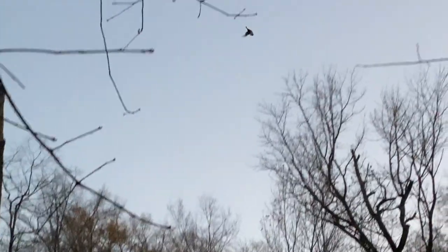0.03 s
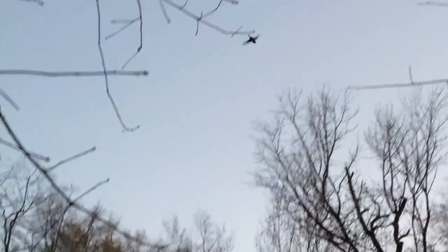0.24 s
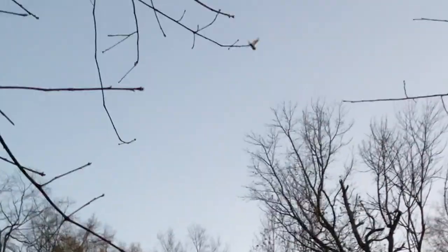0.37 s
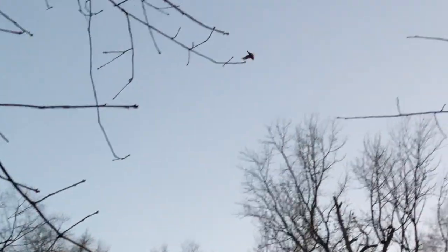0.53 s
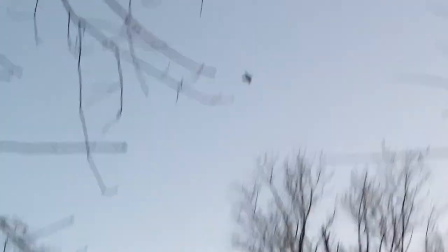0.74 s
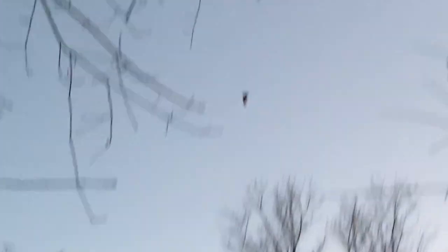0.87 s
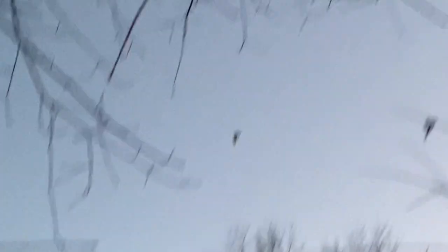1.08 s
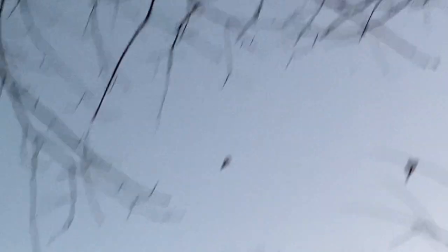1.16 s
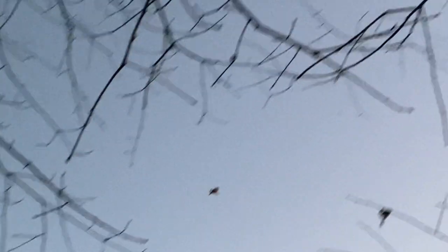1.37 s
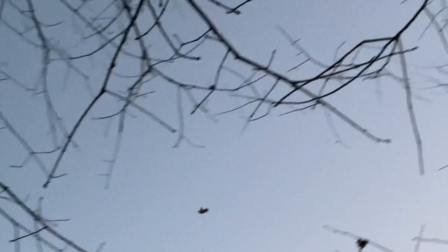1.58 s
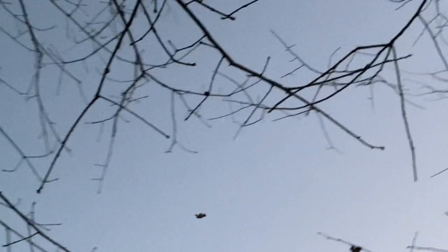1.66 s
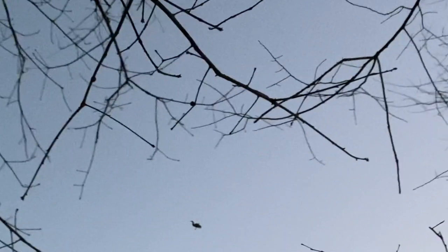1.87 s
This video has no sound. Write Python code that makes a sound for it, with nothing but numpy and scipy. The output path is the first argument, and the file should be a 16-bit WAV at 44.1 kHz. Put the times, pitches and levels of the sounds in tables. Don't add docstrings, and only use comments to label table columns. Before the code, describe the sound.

Two shotgun blasts fire close together, the second louder, after the faint rumble of an earlier shot. Echoes clatter off nearby trunks and thump from tree lines, fading in open woodland, captured by a small stereo recorder.

```python
import sys
import numpy as np
from scipy import signal
from scipy.fft import rfft, irfft, next_fast_len
from scipy.io import wavfile
from scipy.ndimage import uniform_filter1d

SR = 44100
rng = np.random.default_rng(int(sys.argv[2]) if len(sys.argv) > 2 else 0)


def materialize(psi):
    bounded = np.clip(np.atleast_2d(psi).T, -1, 1)
    quanta = np.round(bounded * 32767).astype(np.int16)
    wavfile.write(sys.argv[1], SR, quanta)


def invert_db(level):
    return 10 ** (np.asarray(level, dtype=float) / 20)


N = 83790


def rms_one(x):
    return x / np.sqrt(np.mean(x ** 2) + 1e-20)


def at_hz(points, hz):
    table_hz, value = np.transpose(points)
    return np.interp(np.log(hz), np.log(table_hz), value)


def drift(rate_hz):
    r = np.exp(-80 * np.pi * rate_hz / SR)
    slow = signal.lfilter([1], [1, -2 * r, r * r], rng.standard_normal(N // 40 + 2002))[2000:]
    return np.interp(np.arange(N) / 40, np.arange(len(slow)), rms_one(slow))


def pan(x, left_right_db):
    return x * invert_db([[left_right_db / 2], [-left_right_db / 2]])


def band(x, low_hz, high_hz, order=3):
    return signal.sosfilt(signal.butter(order, [low_hz, high_hz], "band", fs=SR, output="sos"), x)


def pulse(start_s, length_s):
    age = (np.arange(N) / SR - start_s) / length_s
    return np.where(age >= 0, (1 - .2 * age) * np.exp(-np.clip(age, 0, 50)), 0)


def roll():
    # time in seconds, level in dB.
    strength = [(0.0, -56.5), (0.174, -65), (0.206, -59.5), (0.222, -28.5), (0.254, -33.5), (0.322, -30),
                (0.38, -33.5), (0.418, -30), (0.428, -19.5), (0.464, -23), (0.48, -21), (0.512, -29),
                (0.682, -36), (0.888, -33), (0.904, -32), (0.91, -33), (1.878, -50.5), (1.9, -48.5)]
    # frequency in Hz, level in dB.
    fresh = [(25, -17), (120, 2.5), (230, -8.5), (1300, -13), (2200, -23), (3800, -21.5), (5500, -28),
             (9600, -33.5)]
    # frequency in Hz, loss in dB per second.
    ageing = [(30, -21), (120, -9.5), (400, -8.5), (1200, -1), (3000, 11.5), (6000, 25), (9000, 33.5)]
    # start in seconds, brightness in dB per octave.
    fresh_at = [
        (-1.41, -0.56),
        (.2180, -1.1),
        (.4260, 0.46),
    ]
    # frequency in Hz, share from 0 to 1.
    likeness = [(60, 1), (130, 0.77), (300, 0.21), (1000, 0.18), (2500, 0.29), (4200, 0.1)]
    # frequency in Hz, left-right in dB.
    lean = [(30, -5.5), (100, 0), (500, -0.5), (1200, -2), (2200, 10), (4000, -9), (5000, 2.2)]
    # frequency in Hz, missing level in dB.
    hole = [(40, 41), (200, 29), (1000, 1.7), (3000, .3), (8000, 2)]
    hole_s, bends_per_s = 0.012, 0.4
    crackle_db, crackle_s, own_db = 2.5, 0.079, 0.83
    treble_knee_s, treble_fall_db_per_s = 0.85, 39.5
    mono_above_hz = 4500

    t = np.arange(N) / SR
    born, tilt = np.transpose(fresh_at)
    last = np.searchsorted(born, t, side="right") - 1
    age = t - born[last]
    old = np.clip(age - treble_knee_s, 0, None)
    crackle = crackle_db * np.exp(-age / crackle_s) * drift(150)
    edges = 22 * 2 ** np.arange(0, 9.3, 1 / 2.5)
    white = rng.standard_normal((2, 2, N + 8000))
    both, apart = 0, 0
    for k, (low, high) in enumerate(zip(edges, edges[1:])):
        mid, side = band(white[k % 2], low, high, 4)[:, 8000:]
        hz = np.sqrt(low * high)
        alike = np.clip(at_hz(likeness, hz), 0, 1)
        db = at_hz(fresh, hz) + tilt[last] * np.log2(hz / 1000)
        db = db - at_hz(ageing, hz) * age * (1 + (hz > 1500) * bends_per_s * age)
        db = db - at_hz(hole, hz) * np.exp(-age / hole_s)
        db = db - (hz > 4000) * treble_fall_db_per_s * old
        db = uniform_filter1d(db, size=int(2 * SR / hz))
        gain = pan(invert_db(db + own_db * drift(29) + (hz > 400) * crackle), at_hz(lean, hz))
        both = both + gain * np.sqrt(1 + alike) * mid
        apart = apart + gain * np.sqrt(1 - alike) * side
    apart = signal.sosfilt(signal.cheby2(8, 50, mono_above_hz * 1.15, fs=SR, output="sos"), apart)
    return invert_db(np.interp(t, *np.transpose(strength)) + 23) * (both + apart * [[1], [-1]])


def hiss():
    return invert_db(-81.5) * rms_one(band(rng.standard_normal((2, N)), 1800, 6560))


def smears():
    # start in seconds, end in seconds, centre in Hz, width in Hz, level in dB, left-right in dB.
    swells = [
        (0.189, 0.22, 3540, 1360, -52, -4.5),
        (1.854, 1.934, 3450, 150, -70, -16),
    ]
    t, out = np.arange(N) / SR, 0
    for start_s, end_s, hz, width_hz, db, left_right_db in swells:
        noise = rms_one(band(rng.standard_normal(N), hz - width_hz / 2, hz + width_hz / 2))
        swell = np.clip((t - start_s) / (end_s - start_s), 0, 1) ** .6 * (t < end_s)
        out = out + pan(invert_db(db) * noise * swell, left_right_db)
    return out


def blasts():
    # start in seconds, level in dB, pulse length in seconds, bounce delay in seconds, left-right in dB.
    shots = [
        (.2182, 2.5, .0011, .0034, -1.0),
        (.4258, 8, .0015, .0018, 1.5),
    ]
    right_late_s, water_share, cut_hz = .0011, .4, 1000
    out = 1e-18
    for start_s, db, length_s, bounce_s, left_right_db in shots:
        ports = []
        for at_s in (start_s, start_s + right_late_s):
            ports.append(pulse(at_s, length_s) + water_share * pulse(at_s + bounce_s, length_s))
        out = out + pan(invert_db(db) * np.array(ports), left_right_db)
    return signal.sosfilt(signal.butter(3, cut_hz, fs=SR, output="sos"), out)


def echoes():
    # start in seconds, level in dB, top in Hz, decay time in seconds, left-right in dB.
    clumps = [(.2186, -22.5, 4600, .004, -1), (.2187, -35, 8000, .003, 1), (.300, -30, 1500, .03, -.5),
              (0.239, -25, 1520, .003, -6.5), (.336, -27.5, 395, 0.018, 0), (.476, -28.5, 2450, .006, 1),
              (.492, -22.5, 853, 0.0023, -22), (.630, -27, 650, 0.028, 2), (0.801, -27, 241, 0.034, -2),
              (0.897, -22, 1480, 0.0055, -10.5), (0.949, -31, 900, 0.0039, -1.5)]
    t, out = np.arange(N) / SR, 0
    for start_s, db, top_hz, decay_s, left_right_db in clumps:
        noise = rng.standard_normal((3, N))
        decay = (t >= start_s) * np.exp(-np.clip(t - start_s, 0, 1) / decay_s)
        scatter = (noise[0] + 0.43 * noise[1:]) * decay
        back = band(scatter + 1e-18, top_hz * 0.3, top_hz)
        out = out + pan(invert_db(db + 5.5) * back / np.max(np.abs(back)), left_right_db)
    return out


def thumps():
    # start in seconds, peak level in dB, lowest Hz, highest Hz.
    tree_lines = [
        (.329, -11.5, 90, 257),
        (.625, -17.5, 70, 300),
        (0.852, -16.5, 90, 220),
        (.940, -15, 100, 198),
    ]
    out = 0
    for start_s, db, low_hz, high_hz in tree_lines:
        back = band(pulse(start_s, 0.0013) + 1e-18, low_hz, high_hz, 2)
        out = out + invert_db(db) * back / np.max(np.abs(back))
    return out


def whine():
    # start in seconds, frequency in Hz, level in dB, left-right in dB.
    line = (1.850, 4008, -49, -14)
    start_s, hz, db, left_right_db = line
    t = np.arange(N) / SR - start_s
    fade = np.clip(t / .05, 0, 1) ** 1.3
    return pan(invert_db(db) * fade * np.sin(2 * np.pi * hz * t), left_right_db)


def scene():
    return roll() + hiss() + smears() + blasts() + echoes() + thumps() + whine()


def top_cut(x):
    return signal.sosfilt(signal.butter(12, 9830, fs=SR, output="sos"), x)


def record(dry):
    left_lag_s = 16.3 / 44100
    sweep_cycles, sweep_floor_hz, sweep_turn = 1.25, 5, -.12
    weak_share, sum_top_hz, cutoff_hz = .22, 9050, 9600

    size = next_fast_len(N + SR)
    hz = np.arange(size // 2 + 1) * SR / size
    turns = sweep_cycles * np.log(1 + hz / sweep_floor_hz) + sweep_turn + np.outer([left_lag_s, 0], hz)
    low_cut = hz ** 2 / (hz ** 2 + 28 ** 2)
    x = irfft(rfft(dry, size) * np.exp(-2j * np.pi * turns) * low_cut, size)
    left, right = rfft(1.6 * np.tanh(x / 1.6))

    def keep(share):
        return np.clip((np.abs(share) - weak_share) * 20, .02, 1) ** (hz > 5000)

    lag_angle = np.pi * hz * left_lag_s
    mid = (left + right) * keep(np.cos(lag_angle)) * np.where(hz > sum_top_hz, .05, 1)
    side = (left - right) * keep(np.sin(lag_angle))
    x = irfft(np.array([mid + side, mid - side]) / 2, size)[:, :N]
    x = signal.sosfilt(signal.ellip(10, .5, 70, cutoff_hz, fs=SR, output="sos"), x)
    return top_cut(x)


dry = scene()
out = record(dry)
materialize(out)
```